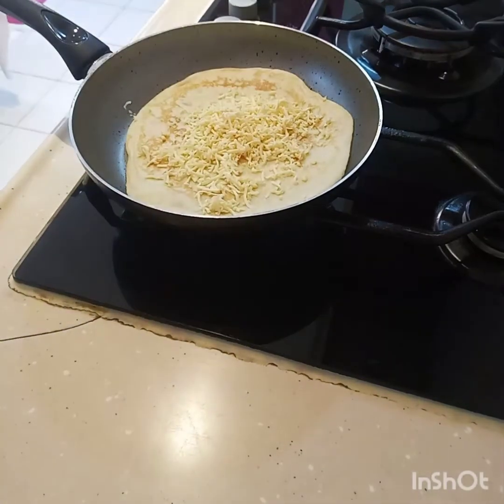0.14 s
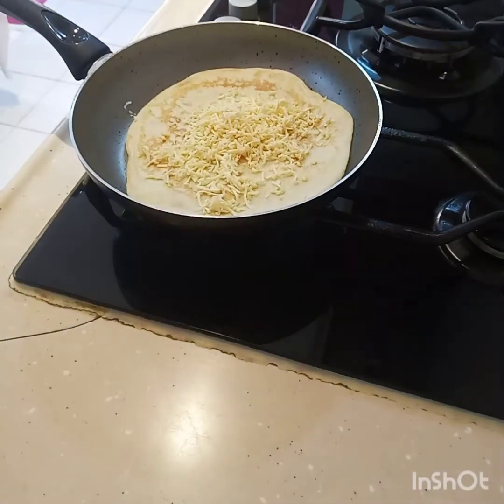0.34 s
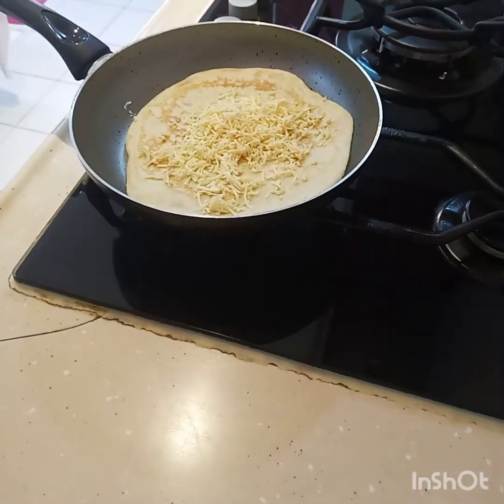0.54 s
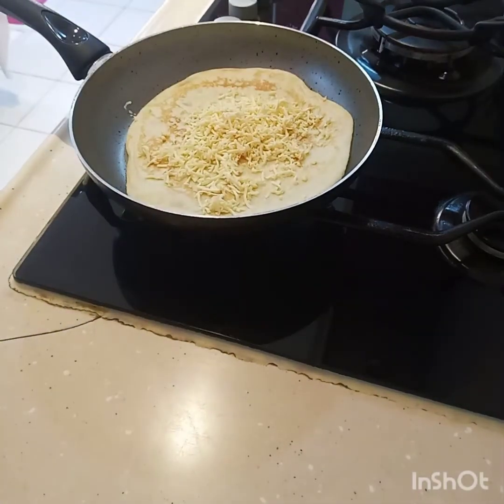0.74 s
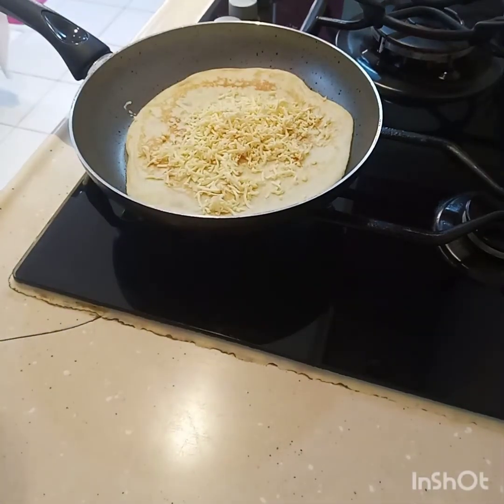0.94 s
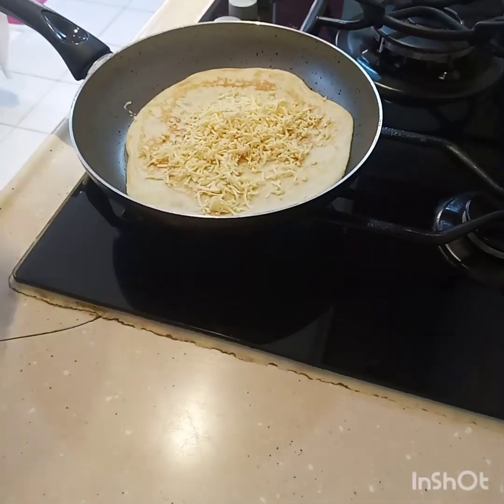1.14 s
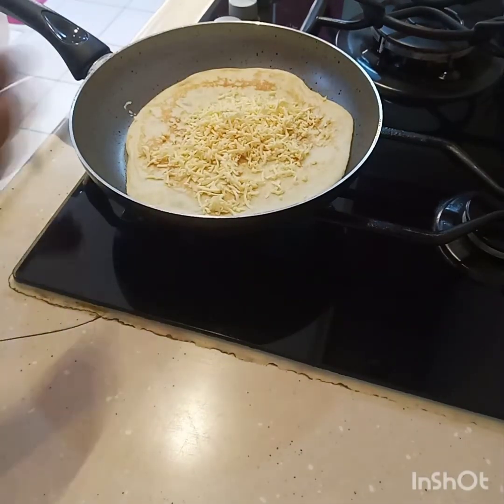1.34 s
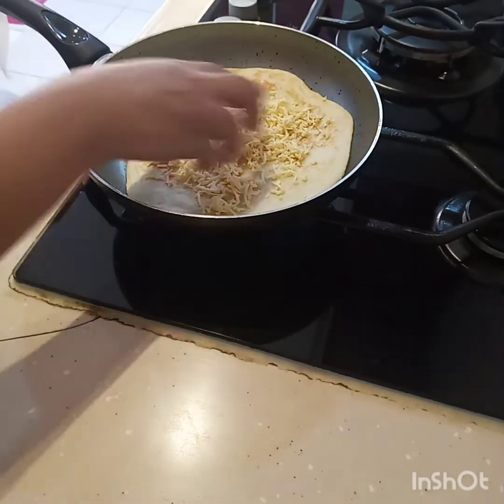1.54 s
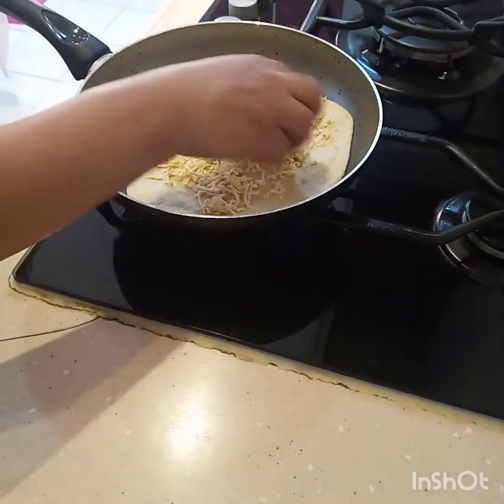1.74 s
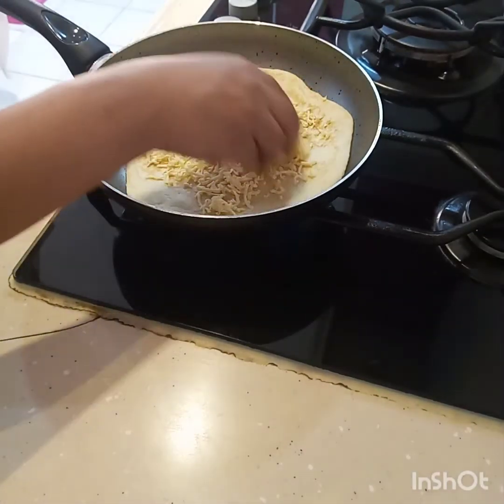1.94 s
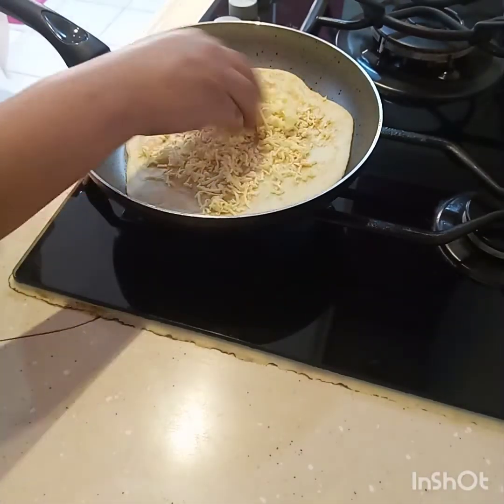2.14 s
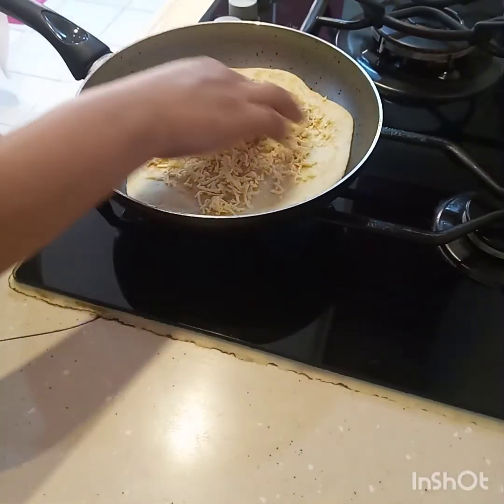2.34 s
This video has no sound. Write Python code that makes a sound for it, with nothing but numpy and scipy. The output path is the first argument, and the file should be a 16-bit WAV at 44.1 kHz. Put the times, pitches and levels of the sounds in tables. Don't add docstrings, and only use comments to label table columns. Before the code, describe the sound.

Early on, a hard dish knocks, slides and rocks on the worktop to the left; afterwards very quiet cheese rustling, a sleeve brush, small crisp ticks and soft bumps over low room tone, captured by a phone.

```python
import sys
import numpy as np
from scipy import signal
from scipy.fft import rfft, irfft, next_fast_len
from scipy.io import wavfile
from scipy.ndimage import uniform_filter1d

SR = 44100
rng = np.random.default_rng(int(sys.argv[2]) if len(sys.argv) > 2 else 0)


def elevation(decibels):
    levels = np.asarray(decibels, float)
    return 10 ** (levels / 20)


def to_wav(sig):
    pcm = np.clip(np.atleast_2d(sig), -1, 1) * 32767
    pcm = np.round(pcm).astype(np.int16)
    wavfile.write(sys.argv[1], SR, pcm.T)


N = 105840
T = np.arange(N) / SR

# [t/s, peak level/dB, chatter hold/s, then chatter t60/s]
KNOCKS = [
    (0.2151, -8.5, 0.0085, 0.019),
    (0.3558, -14.5, 0.018, 0.15),
]
# [t/s, friction level/dB, low rumble level/dB]
SLIDE = [(.196, -56.5, -56), (.21, -39, -41), (.225, -24, -39), (.26, -32.5, -36.5), (.3, -30.5, -37),
         (.35, -40, -50), (.375, -57, -39.5), (.44, -62, -41.5), (.56, -60, -71.5)]
# [f/Hz, level/dB]
RUSTLE_SPECTRUM = [(2000, -8), (2900, -6), (4200, 0.5), (5300, -7.5), (7500, 3.5), (9200, -9.5),
                   (11500, -6.5), (13600, -19.5), (15200, -4), (15700, -8)]
# [f/Hz, level/dB]
PATTER_SPECTRUM = [(330, -14), (560, -8), (810, 1), (950, -1.5), (1150, 4), (1550, -14), (2050, -2.5),
                   (2600, -24.5)]
# [f/Hz, level/dB]
SLEEVE_SPECTRUM = [(700, -11.5), (1000, -9), (1450, -2.5), (2500, -4.5), (7200, -3.5), (9200, -15.5),
                   (14000, -29)]
# [f/Hz, level/dB]
HOUSE_SPECTRUM = [(28, -11), (45, -31), (65, -3.3), (125, 0.8), (260, -3), (330, -9.5), (450, -22.5)]


def decay(t, t60):
    return np.exp(-np.log(1000) * t / t60)


def bell(centre, half_length):
    return np.exp(-0.5 * ((T - centre) / half_length) ** 2)


def fade(start, t60, rise):
    t = np.maximum(T - start, 0)
    return np.minimum(t / rise, 1) * decay(t, max(t60, 0.004))


def curve(rows, column):
    rows = np.array(rows)
    outside = np.maximum(np.maximum(rows[0, 0] - T, T - rows[-1, 0]), 0)
    return elevation(np.interp(T, rows[:, 0], rows[:, column]) - 2300 * outside)


def calming():
    return elevation(-1.5 * T)


def grid(table, hz):
    table = np.array(table)
    return np.interp(np.log(hz + 1), np.log(table[:, 0] + 1), table[:, 1])


def colour(x, table, edge_db=-30):
    low_hz, low_db = table[0]
    top_hz, top_db = table[-1]
    end_hz = top_hz * (1.5 if top_hz < 15e3 else 1.025)
    table = [(low_hz / 2, low_db + edge_db)] + list(table) + [(end_hz, top_db + 1.5 * edge_db)]
    log_gain = grid(table, np.fft.rfftfreq(8192, 1 / SR)) * np.log(10) / 20
    cepstrum = irfft(log_gain)
    cepstrum[1:4096] *= 2
    cepstrum[4097:] = 0
    response = irfft(np.exp(rfft(cepstrum)))
    return signal.fftconvolve(x, response / np.sqrt(np.sum(response ** 2)))[:N]


def ring(x, hz, width):
    return signal.lfilter(*signal.iirpeak(min(hz, 0.45 * SR), hz / max(width, 2), fs=SR), x)


def walk(rate):
    k = int(SR / rate)
    steps = np.repeat(rng.standard_normal(N // k + 1), k)
    w = uniform_filter1d(uniform_filter1d(steps, k), k)[:N]
    return w / w.std()


def grains(spread_db, flicker_db, rate):
    sizes = np.repeat(rng.exponential(size=N // 12 + 1), 12)[:N]
    x = elevation(spread_db * sizes + flicker_db * walk(rate)) * rng.standard_normal(N)
    return x / x.std()


def patchy(x, depth_db, rate):
    spectrum, octave = rfft(x), np.log2(np.fft.rfftfreq(N, 1 / SR) + 1)
    out = 0
    for centre in np.arange(9, 30) / 2:
        weight = np.maximum(1 - 2 * np.abs(octave - centre), 0)
        out = out + elevation(depth_db * walk(rate)) * irfft(spectrum * weight, N)
    return out


def settling():
    ends_s = 0.021
    level = elevation(-49.5 - 200 * np.maximum(T - ends_s, 0))
    return level * colour(grains(3.1, 0.99, 96), [(280, -3), (450, 11.0), (800, -6), (1700, -2.0)])


def air():
    tone = 0
    for db, spectrum in [(-61.5, RUSTLE_SPECTRUM), (-62.5, PATTER_SPECTRUM), (-64, HOUSE_SPECTRUM)]:
        tone = tone + elevation(db) * colour(grains(0.65, 3.3, 14.78), spectrum)
    return patchy(calming() * tone, 4.5, 11.58)


def murmur():
    noise = colour(rng.standard_normal(N), HOUSE_SPECTRUM)
    bands = 0
    for hz in 35 * 2 ** np.arange(0, 4.1, 0.5):
        bands = bands + elevation(2.6 * walk(12)) * ring(ring(noise, hz, hz / 2), hz, hz / 2)
    return elevation(-62) * bands / bands.std()


def hum():
    # [f/Hz, level/dB]
    lines = [(418, -80), (1120, -78)]
    tone = sum(elevation(db + 3 * walk(6)) * np.sin(2 * np.pi * hz * T) for hz, db in lines)
    return tone * np.array([[0.6], [1]])


def fingers():
    # [t/s, half length/s, rustle level/dB, dull patter level/dB, patter f/Hz]
    stirs = [(-0.009, 0.039, -58.5, -47, 890), (0.126, 0.025, -74, -55.5, 1040),
             (0.755, 0.03, -79, -62.5, 980), (0.865, 0.037, -58, -76, 1000),
             (1.016, 0.046, -59.5, -54.5, 990), (1.17, 0.086, -55, -60, 1110),
             (1.616, 0.013, -63, -61, 1480), (1.652, 0.028, -55, -51.5, 1230),
             (1.721, 0.015, -61, -57, 950), (1.99, 0.027, -64, -50.5, 840), (2.078, 0.028, -55, -54, 780),
             (2.167, 0.03, -70, -55.5, 1080)]
    # [f/Hz, level/dB]
    stir_spectrum = [(560, 0.5), (780, -0.1), (1200, 1.5), (2100, 2), (2800, -5.5)]
    base = calming()
    pats = colour(grains(1.4, 1.5, 40.2), stir_spectrum)
    rustle, stirred = elevation(-66) * base, 0
    for s, half_length, rustle_db, patter_db, hz in stirs:
        swell = bell(s, half_length)
        rustle = rustle + elevation(rustle_db) * swell
        stirred = stirred + elevation(patter_db + 5) * swell * ring(pats, hz, 0.43 * hz)
    shuffle = rustle * colour(grains(2.1, 1.8, 25), RUSTLE_SPECTRUM)
    patter = elevation(-60) * base * colour(grains(1.3, 1.8, 30.37), PATTER_SPECTRUM)
    return patchy(shuffle + patter, 1.11, 15) + stirred


def bumps():
    # [t/s, level/dB, f/Hz, length/s]
    thuds = [(0.227, -59, 70, 0.055), (.3, -46, 75, 0.054), (.06, -59, 70, 0.054),
             (0.48, -61.5, 4250, 0.035), (.841, -49.5, 2020, .008), (1.64, -57, 71, .05),
             (1.24, -58, 70, .04), (0.613, -58, 115, 0.03), (0.862, -53, 220, 0.084),
             (0.873, -58.5, 75, 0.1), (1.061, -56.5, 313.8, 0.063), (1.203, -57.5, 117, 0.075),
             (1.255, -58.5, 255, 0.028), (1.64, -50.5, 138.3, 0.028), (1.644, -53.5, 270, 0.039),
             (1.702, -49.5, 110, 0.015), (1.863, -56.5, 245, 0.054), (1.9702, -41.5, 807, 0.006),
             (2.027, -57.5, 777, 0.058), (2.055, -56, 119.5, 0.13), (2.164, -55.5, 164, 0.04),
             (2.283, -54.5, 235, 0.051)]
    out = 0
    for s, db, hz, length in thuds:
        tone = np.sin(2 * np.pi * hz * T + 1.63 * walk(30))
        out = out + elevation(db + 2.0) * bell(s, 0.42 * length) * tone
    return out


def crisp():
    # [t/s, peak level/dB, tilt of the top/dB]
    snaps = [(0.09, -33.5, 2), (0.096, -34, -1), (.119, -35, -4), (1.0442, -28.5, -7), (1.046, -28, -10),
             (1.0474, -30.5, -8.5), (1.051, -47, 5), (1.055, -40, 0), (1.0783, -36, -4), (1.56, -38, 1),
             (1.8656, -36, -2), (1.867, -31.5, -3), (1.8734, -36, -8), (1.875, -45, -3), (1.962, -38, 5),
             (1.967, -45, 6), (2.052, -36, -9), (2.055, -38, -11), (2.0592, -32, 6), (2.0627, -27, -2.5),
             (2.0615, -28, -1), (2.067, -44, 9), (2.069, -39, 8), (2.074, -48, 0), (2.345, -38.5, 6),
             (2.395, -40.5, 16)]
    # [f/Hz, level/dB]
    snap_spectrum = [(1500, -12.5), (3000, -4), (5400, -7.5), (7100, 1.5), (9000, -6), (11500, -7),
                     (13500, -7.5), (15200, 3.5), (16300, -21)]
    noise = np.sign(rng.standard_normal(N))
    low, high = 0, 0
    for s, db, top_db in snaps:
        spray = elevation(-22.5) * fade(s, 0.069, 0.0064)
        shape = fade(s, 0.0065, 0.0002) + spray
        low = low + elevation(db - top_db / 2) * shape
        high = high + elevation(db + top_db / 2) * shape
    lows, highs = (signal.butter(3, 10000, kind, fs=SR, output="sos") for kind in ("low", "high"))
    full = signal.sosfilt(lows, colour(low * noise, snap_spectrum))
    thin = signal.sosfilt(highs, colour(high * noise, snap_spectrum))
    return elevation(-5.0) * (full + thin)


def scrape():
    # [f/Hz, level/dB]
    scrape_spectrum = [(300, -15), (480, -9), (1300, -5.5), (1750, 2), (2400, -10.5), (3400, -22),
                       (6500, -51)]
    return elevation(-3) * colour(curve(SLIDE, 1) * grains(0.9, 0.6, 60), scrape_spectrum)


def rumble():
    # [f/Hz, level/dB]
    rumble_spectrum = [(45, -32), (90, -8), (150, -7.5), (220, -8), (480, -5)]
    return curve(SLIDE, 2) * colour(grains(0.67, 2.4, 25.4), rumble_spectrum)


def dish_body():
    # [f/Hz, width/Hz, level/dB]
    modes = [(600, 26, -1.5), (1016, 79, -4), (1296, 40, 0.5), (1640, 58.6, 1.5), (1840, 62, -9),
             (1920, 112, -6.5), (2066, 82, -3.5), (2436, 56, -7.5), (2530, 77, -12)]
    chatter_s, sag_db_per_s = 0.0023, -450
    blows = np.zeros(N)
    for start, db, hold, t60 in KNOCKS:
        jitter = 0.17 * rng.standard_normal(20) * (np.arange(20) > 0)
        late = chatter_s * (np.arange(20) + jitter)
        force = elevation(db + sag_db_per_s * late) * decay(np.maximum(late - hold, 0), t60)
        blows[((start + late) * SR).astype(int)] += force
    blows = np.convolve(blows, np.hanning(13))[:N]
    body = 0
    for k, (hz, width, db) in enumerate(modes):
        body = body + (-1) ** k * elevation(db) * ring(blows, hz, 2.84 * width)
    return body * elevation(KNOCKS[0][1] + 0.5) / np.abs(body).max()


def dish_rim():
    # [f/Hz, level/dB, t60/s]
    rim_modes = [(5350, -38.5, 0.077), (7760, -32.5, 0.09)]
    strikes = np.zeros(N)
    for start, db, *_ in KNOCKS:
        strikes[int(start * SR)] = elevation(db)
    rubbing = curve(SLIDE, 1) * grains(0.91, 1.3, 43)
    t = np.arange(SR // 2) / SR
    rings = 0
    for hz, db, t60 in rim_modes:
        rings = rings + elevation(db) * np.sin(2 * np.pi * hz * t) * decay(t, t60) * np.minimum(t / 0.00081, 1)
    return signal.fftconvolve(1.14 * strikes + 0.19 * rubbing, rings)[:N]


def counter():
    hz, width_hz, boom_db, t60_s = 850, 250, -28, 0.72
    boom = ring(ring(rng.standard_normal(N), hz, width_hz), hz, 2.2 * width_hz)
    level = sum(elevation(db + boom_db) * fade(s, t60_s, 0.0096) for s, db, *_ in KNOCKS)
    return boom / boom.std() * level


def shreds():
    # [t/s, peak level/dB, f/Hz]
    landings = [(0.29, -34, 5470), (.487, -46, 4430), (0.541, -37.5, 1100), (.633, -35.5, 7400),
                (0.802, -35.5, 7100), (0.84, -34.5, 2000), (0.968, -39.5, 4200), (1.15, -38, 4400),
                (1.438, -37, 6160), (1.444, -44.5, 3860), (1.511, -45, 3720), (1.596, -38, 1640),
                (1.697, -35.5, 7200), (1.801, -36, 6700), (1.978, -37, 3900), (1.988, -35.5, 4340),
                (1.995, -51, 4170), (2.017, -36, 2050), (2.186, -41.5, 2000)]
    q, t60_s = 8.3, 0.033
    rings, ticks, noise = 0, 0, np.sign(rng.standard_normal(N))
    for s, db, hz in landings:
        burst = elevation(db - 6.0) * fade(s, t60_s, 0.0011) * noise
        ticks = ticks + burst
        rings = rings + ring(ring(burst, hz, hz / q), hz, hz / 2) * np.sqrt(SR * q / hz / 4)
    return elevation(-4.5) * colour(ticks, SLEEVE_SPECTRUM) + elevation(-3) * rings


def sleeve():
    centre_s, rise_s, fall_s = 1.2356, 0.031, 0.07
    sweep = elevation(-43) * bell(centre_s, np.where(T < centre_s, rise_s, fall_s))
    return sweep * colour(grains(1.8, 1.0, 70.3), SLEEVE_SPECTRUM)


def ports(x, wet_db, t60, right_db=0., lag=0.00114):
    # [f/Hz, left minus right level/dB]
    balance = [(60, 1), (200, 5), (420, 6), (750, 13.5), (2400, 18), (7600, 17), (9300, 20), (11500, -22),
               (13500, 19), (15500, -12)]
    size = next_fast_len(N + SR)
    hz = np.fft.rfftfreq(size, 1 / SR)
    ratio = elevation(right_db - grid(balance, hz))
    left = 2 / np.sqrt(1 + ratio ** 2)
    gains = np.array([left, left * ratio * np.exp(2j * np.pi * hz * lag)])
    t = np.arange(SR // 2) / SR
    tail = rng.standard_normal((3, len(t))) * decay(t, t60) * np.minimum(t / 0.01, 1)
    tail = rfft(tail / np.sqrt(np.sum(tail[0] ** 2)), size)
    alike = 1 / (1 + (hz / 500) ** 2)
    room = 1 + elevation(wet_db) * (np.sqrt(alike) * tail[2] + np.sqrt(1 - alike) * tail[:2])
    return irfft(rfft(x, size) * gains * room, size)[:, :N] / np.sqrt(1 + elevation(2 * wet_db))


def scene():
    duck = elevation(-1.5 * bell(0.63, 0.093))
    far = settling() + scrape() + rumble() + dish_body() + dish_rim() + counter()
    far = signal.sosfilt(signal.butter(6, 9500, fs=SR, output="sos"), far)
    out = ports(far, -7.5, 0.4, 0.93, 0.000863)
    out = out + duck * ports([air(), air()], -14, 0.06)
    out = out + ports(murmur() + bumps(), -4.5, 0.056) + hum()
    out = out + duck * ports(fingers() + sleeve(), -7, 0.15)
    out = out + ports(crisp(), -6, 0.035, 2.5)
    out = out + elevation(-0.5) * ports([scrape(), scrape()], -2, 0.095, 7.0)
    return out + ports(shreds(), -0.93, 0.075)


def low_pass(x):
    return signal.sosfilt(signal.butter(12, 16980, fs=SR, output="sos"), x)


def record(dry):
    return low_pass(dry)


dry = scene()
out = record(dry)
to_wav(out)
```